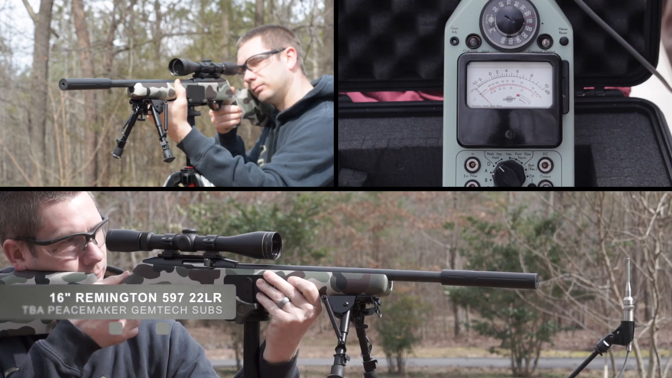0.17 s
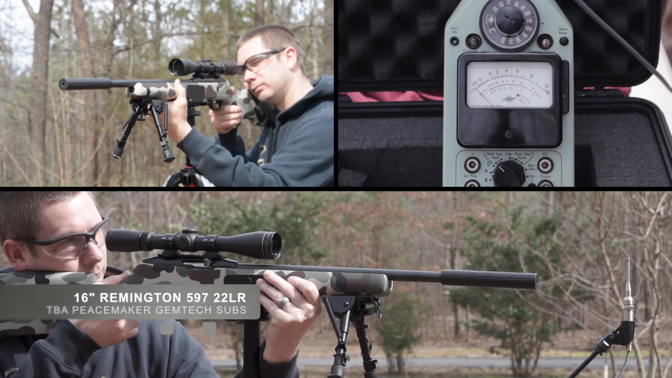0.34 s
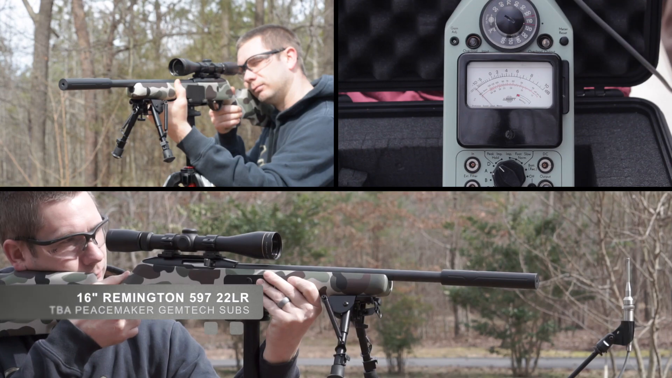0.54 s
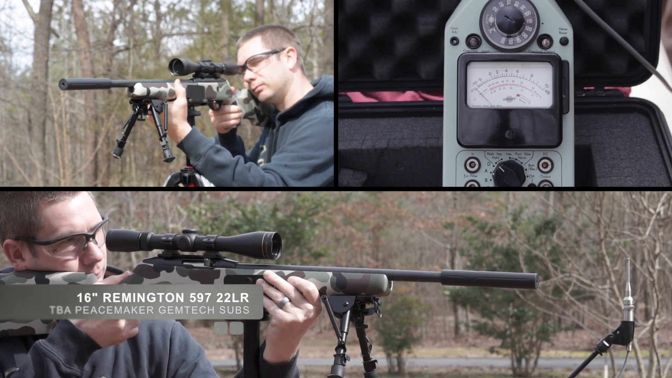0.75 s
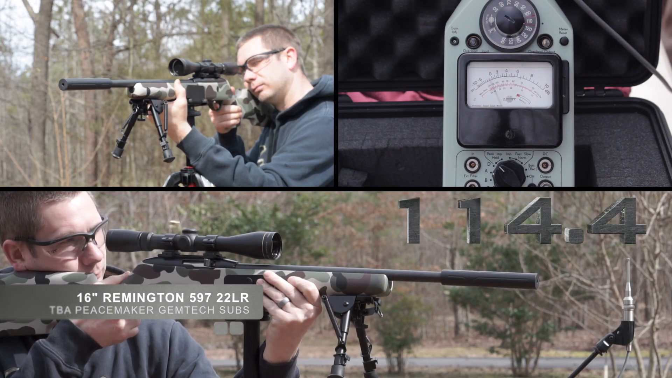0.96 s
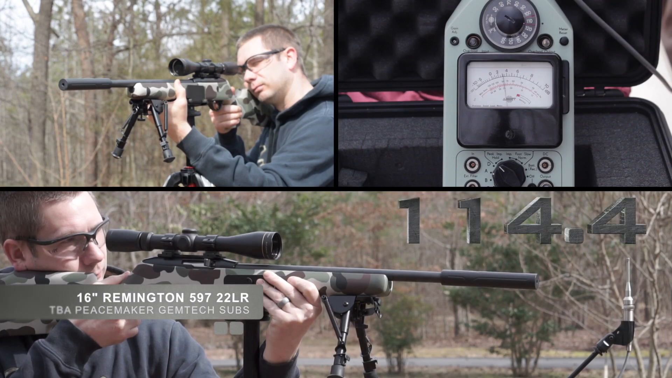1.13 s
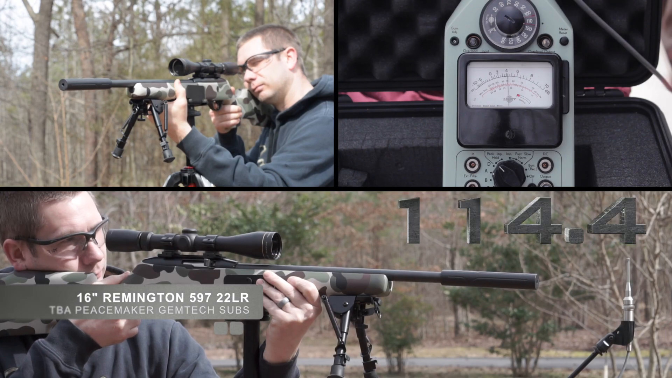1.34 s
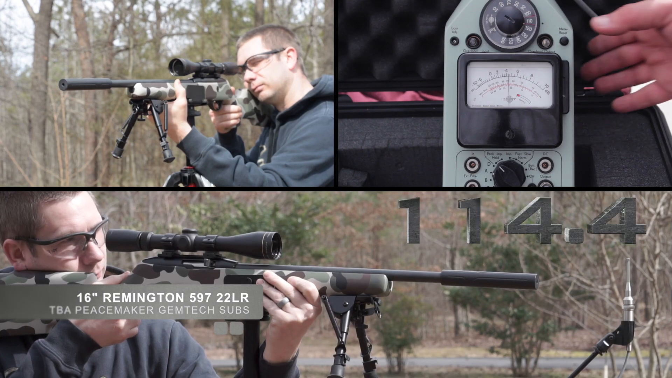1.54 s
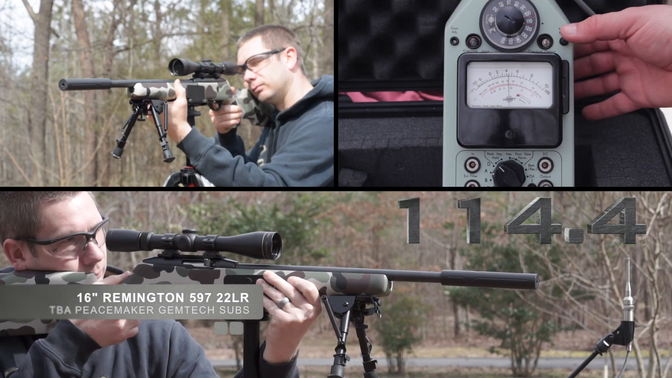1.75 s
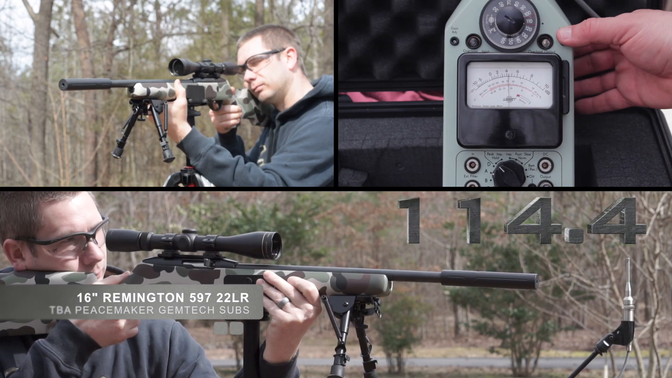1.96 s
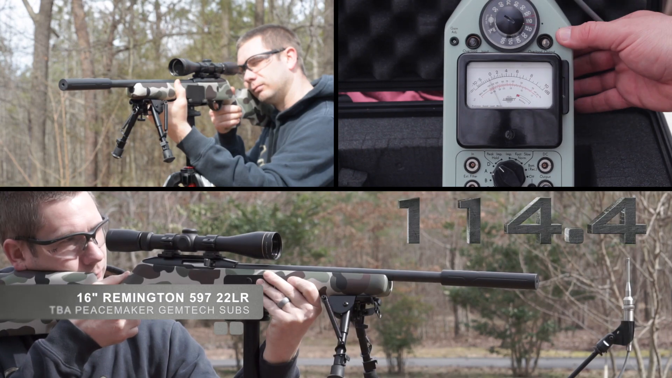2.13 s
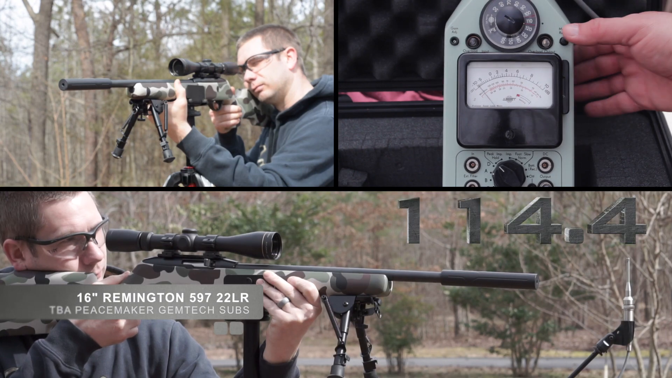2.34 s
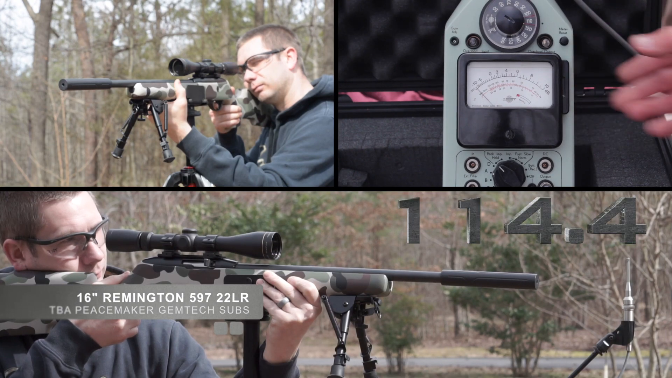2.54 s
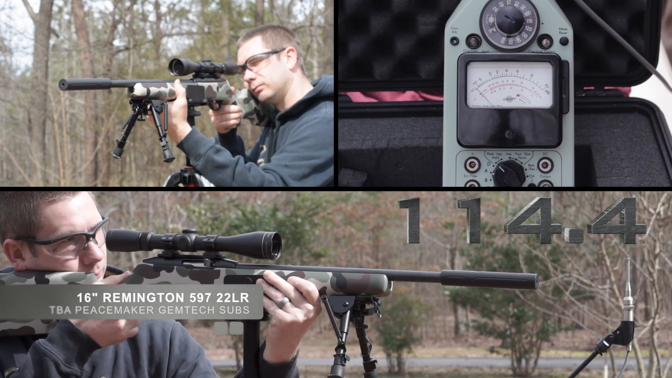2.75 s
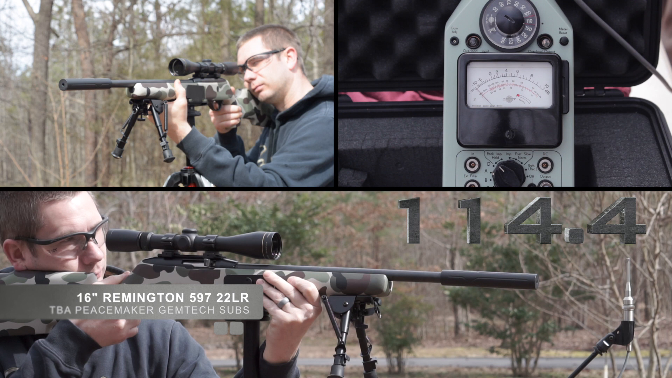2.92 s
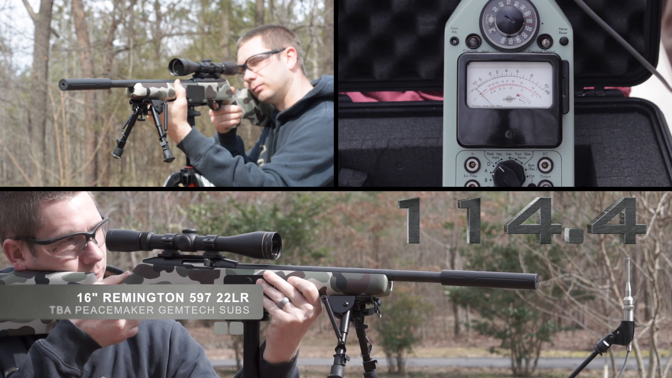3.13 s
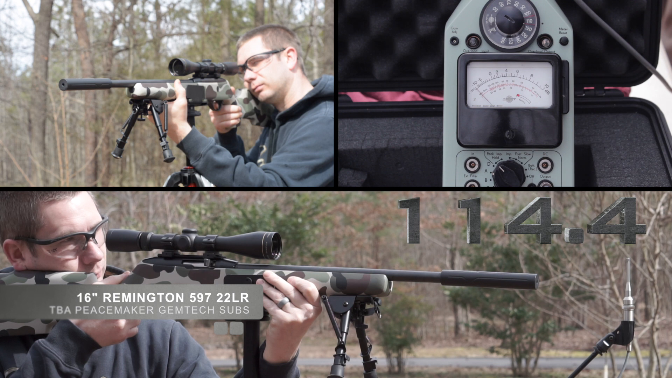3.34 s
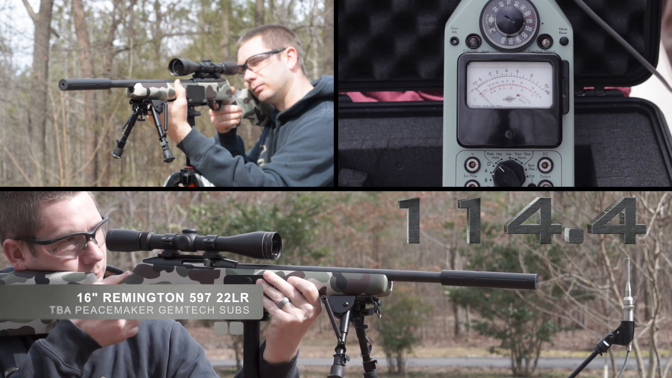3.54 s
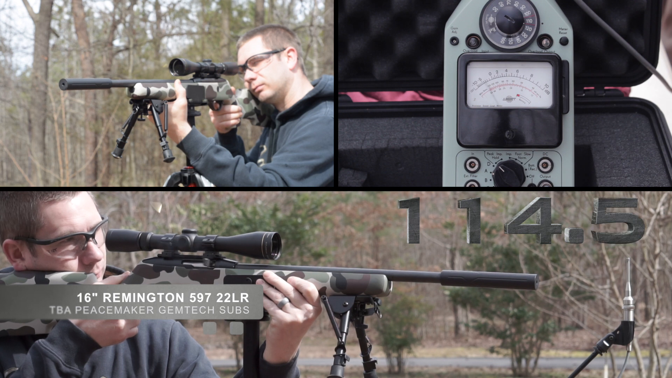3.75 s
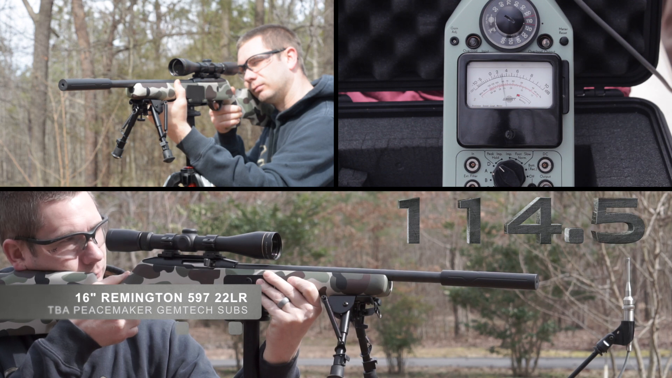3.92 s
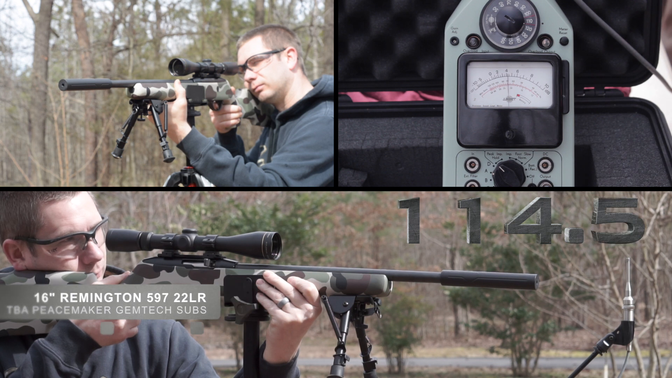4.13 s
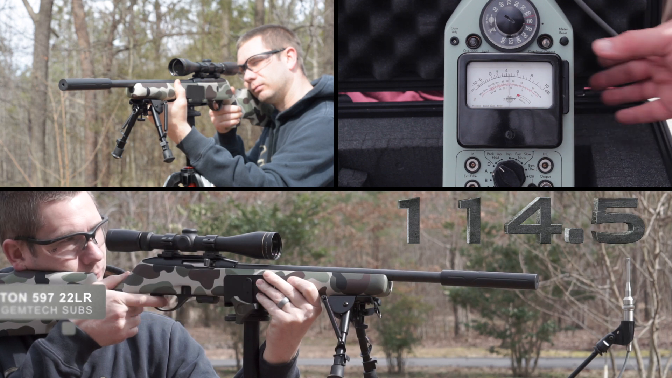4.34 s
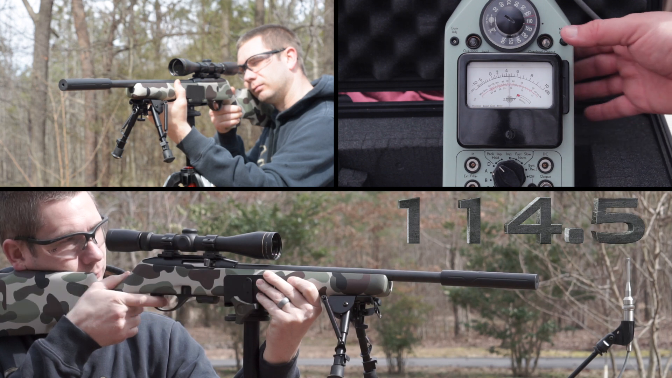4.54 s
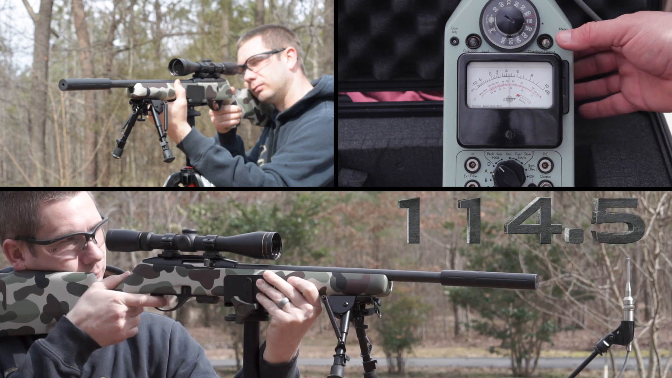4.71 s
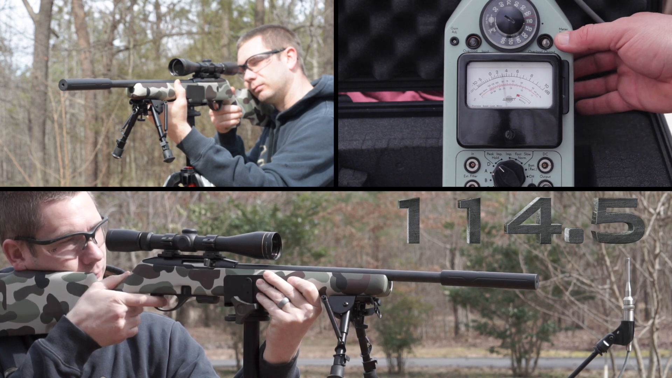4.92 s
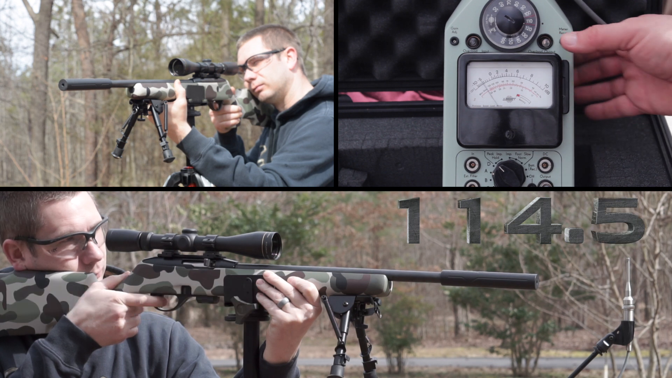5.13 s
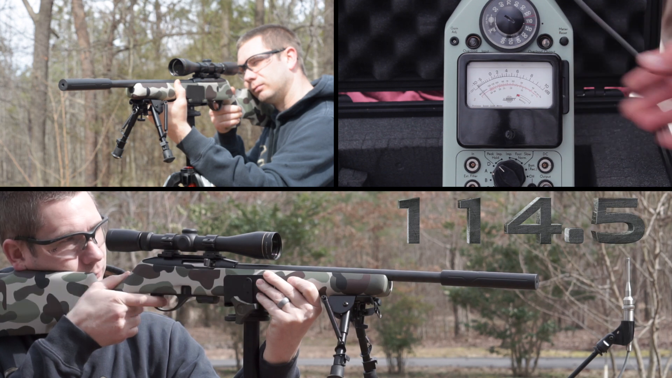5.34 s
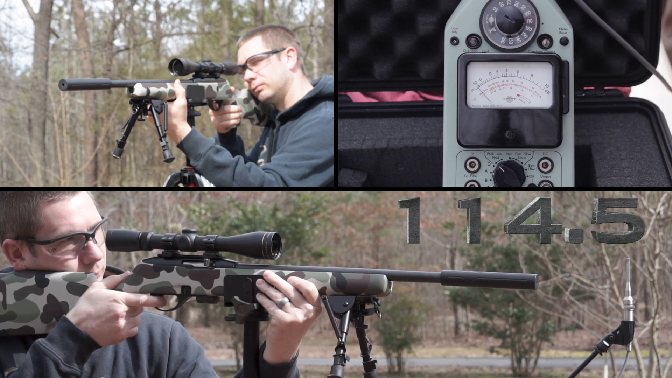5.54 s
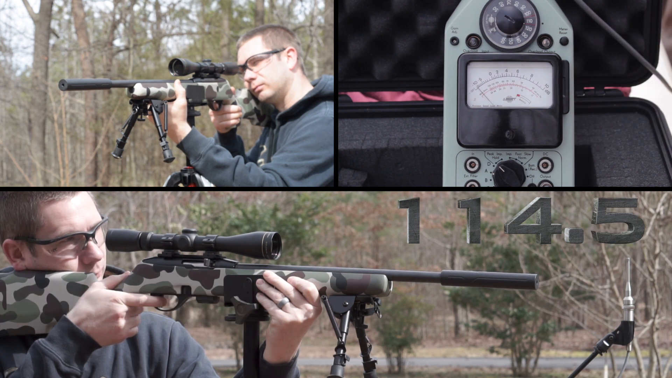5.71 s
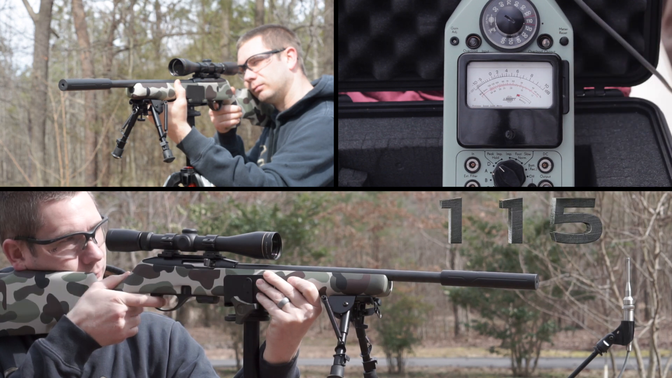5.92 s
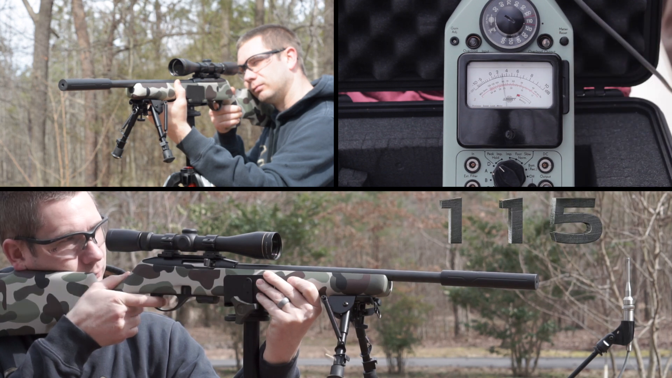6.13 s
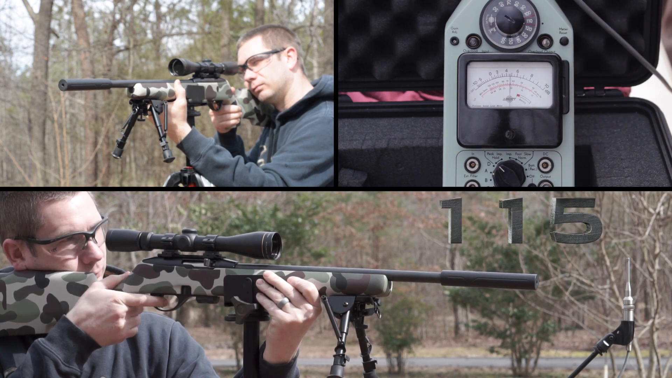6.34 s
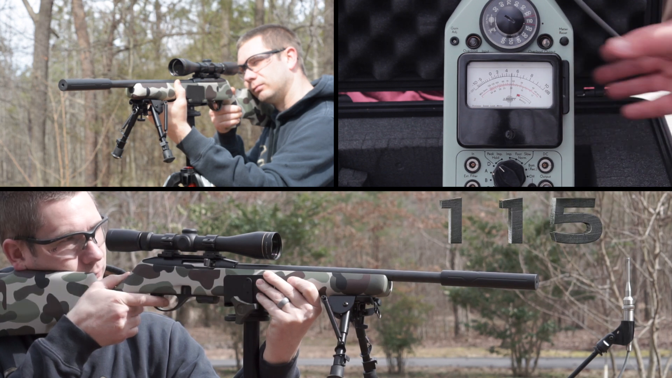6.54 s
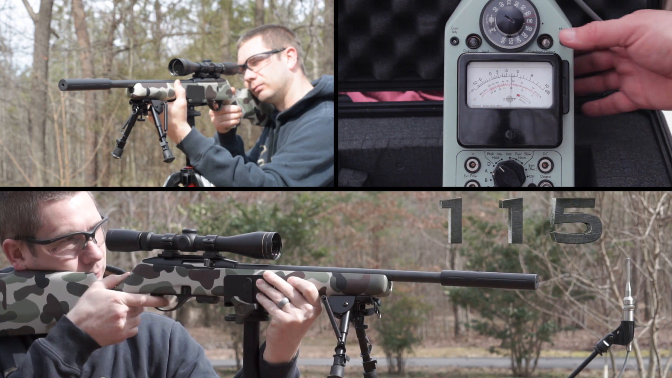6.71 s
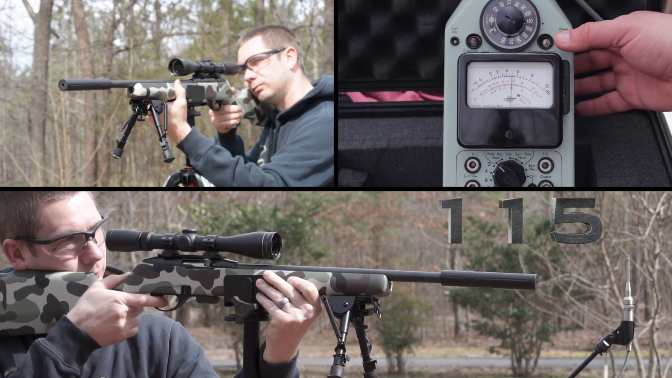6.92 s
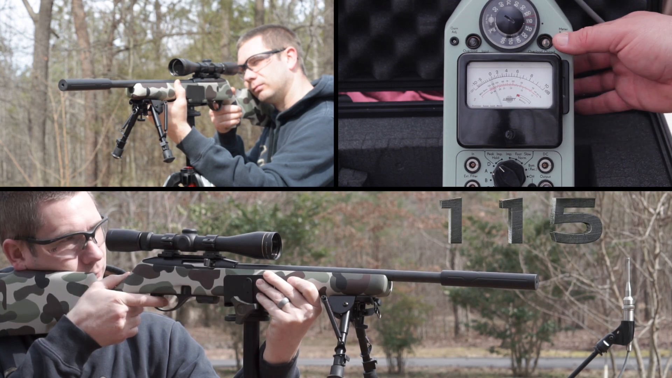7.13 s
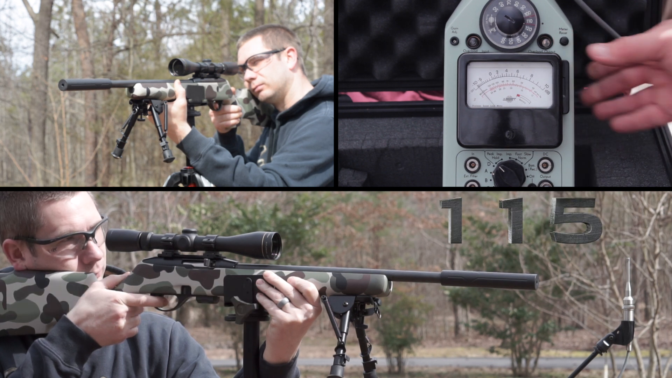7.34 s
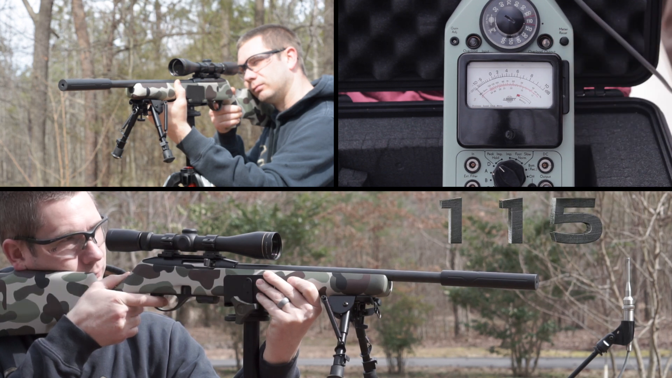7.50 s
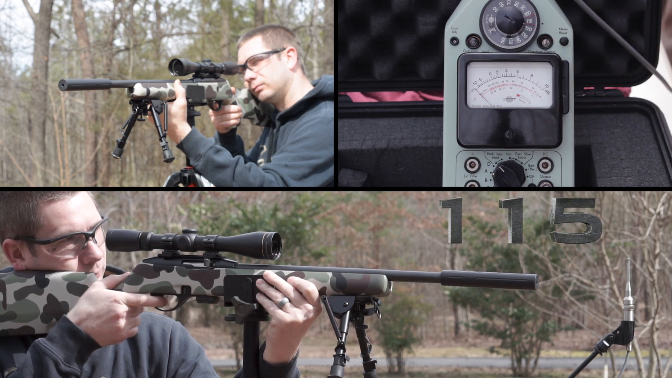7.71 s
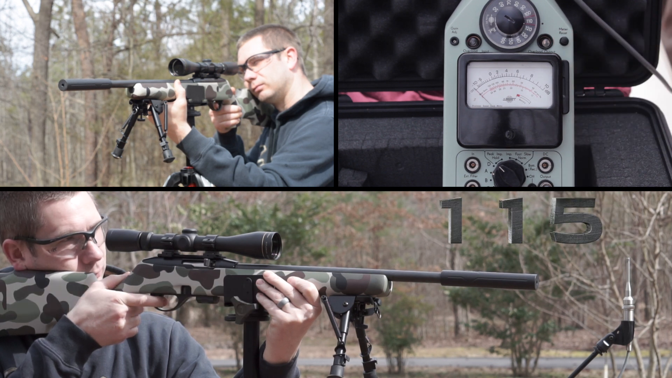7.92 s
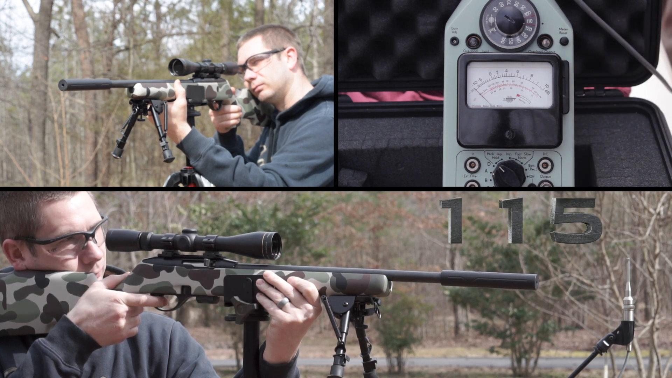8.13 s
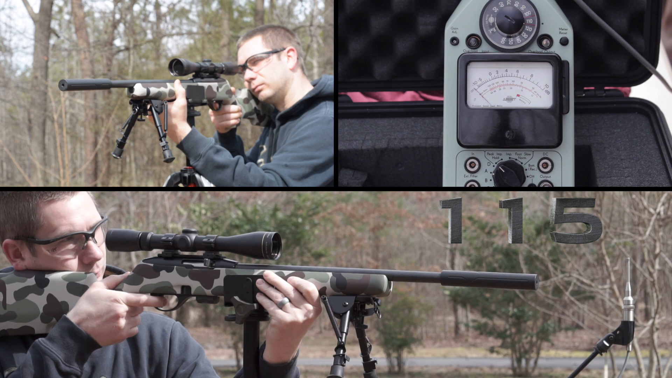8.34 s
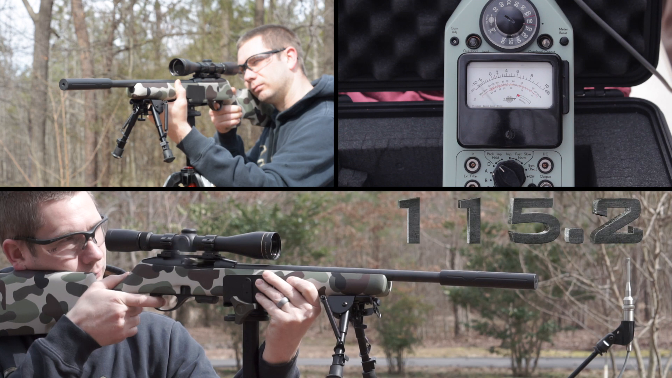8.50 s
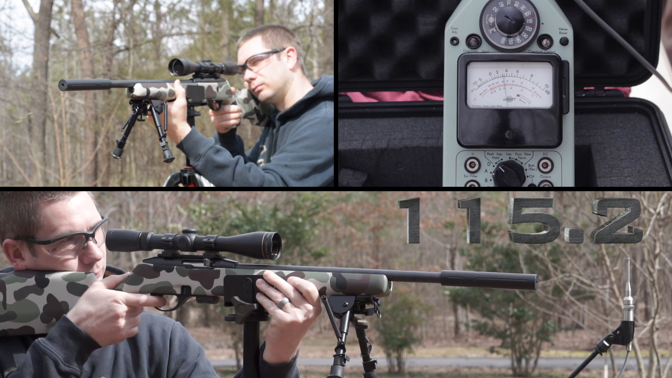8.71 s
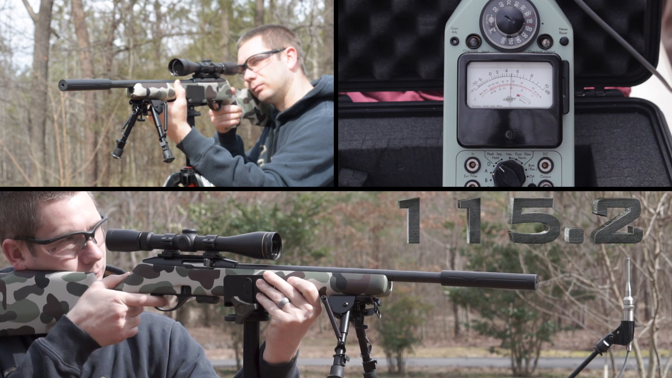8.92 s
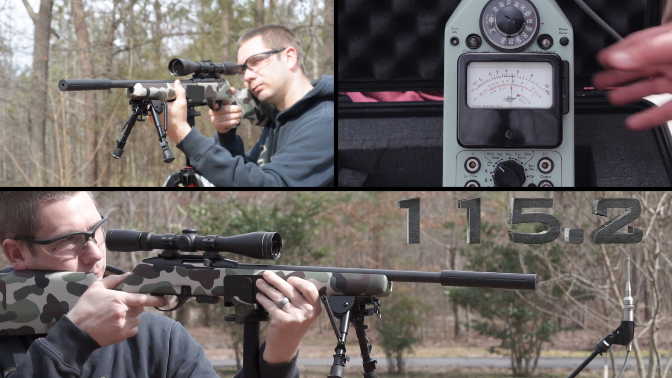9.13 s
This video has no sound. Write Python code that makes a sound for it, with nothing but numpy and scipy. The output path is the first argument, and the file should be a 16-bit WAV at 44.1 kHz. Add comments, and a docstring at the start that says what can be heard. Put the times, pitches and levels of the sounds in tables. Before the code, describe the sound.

Close microphone outdoors at a tree line, over soft low traffic rumble and a fading distant car. A quiet semi-automatic rifle fires four times, spaced two to three seconds apart: snappy puff, steel clatter, small case tap, faint far thud. After the third, the case bounces with a tiny ping and one low hollow boom sounds. Wind gusts gently before the last shot.

```python
"""Far traffic, a car drawing away and a little wind lie under the whole scene: the edge of a wood.
Four times a quiet small-bore rifle fires: a hammer tick, then a puff of gas through its suppressor,
which rings the tube; the bolt slides, slams shut and strikes again, and the trees add a faint tail.
Then the spent case knocks on something hard and the bullet's thud returns from a far earth bank.
After the third shot one case bounces and pings, and a single low, hollow boom is heard."""
import sys
import numpy as np
from scipy import signal
from scipy.fft import rfft, irfft
from scipy.io import wavfile
from scipy.ndimage import uniform_filter1d

SR = 44100
rng = np.random.default_rng(int(sys.argv[2]) if len(sys.argv) > 2 else 0)


def output_pcm(signal):
    """Save a mono or channel-first signal as 16-bit PCM at the path in sys.argv[1].

    Samples are clipped to [-1, 1] before scaling.
    """
    pcm = np.clip(np.atleast_2d(signal).T, -1, 1) * 32767
    wavfile.write(sys.argv[1], SR, np.round(pcm).astype(np.int16))


N = 408581
TIME = np.arange(N) / SR  # seconds

# All levels are relative: most layers get a further trim where they are mixed.
# Colour of the open air: pitch_hz, level_db (per Hz)
AIR_COLOUR = [(15, -37), (25, -11), (64, 0), (80, 0.5), (212, -16.5), (285, -17.5), (317, -19), (405, -20),
              (695, -21), (962, -19.5), (1520, -24.5), (2760, -35.5), (4740, -37.5), (14800, -41),
              (16000, -41)]
# Colour of the wind: pitch_hz, level_db (per Hz)
WIND_COLOUR = [(20, -2.5), (35, 0.5), (70, 2), (115, 3), (170, -9.5), (280, -24.5), (600, -50.5)]
# Gusts of wind: peak_s, level_db
WIND_GUSTS = [(4.65, -64.5), (7.6, -59), (8.07, -58.5), (8.31, -55), (9.25, -65.5)]
# The rounds fired: start_s, gas_level_db, crack_level_db, bolt_cycle_s, case_flight_s, bank_thud_level_db
ROUNDS = [(0.9205, -16.5, -6, 0.041, 0.29, -73), (3.7640, -15.5, -6.5, 0.043, .2663, -64),
          (5.9973, -15, -8.5, .0418, .2803, -64), (8.5462, -15, -13, .0442, .2878, -66.5)]
# Colour of the gas, also used for the hammer and ejection: pitch_hz, level_db (per Hz)
GAS_COLOUR = [(100, -20), (300, -16), (550, -11), (750, -10), (1400, 0), (2400, 1), (3200, -3.5),
              (4400, -2), (6500, -8), (10000, -10.5), (13000, -14), (16000, -13.5)]
# Ringing of suppressor and barrel: pitch_hz, level_db, time_to_fall_60_db_s
TUBE_MODES = [(427, -16, .03), (560, -4.5, .028), (940, -14.5, 0.052), (1067, -10.5, 0.063),
              (1386, -3, 0.052), (1407, -3, .035), (1850, -9, 0.021), (2020, -8.5, .035), (2410, 4, .038),
              (2633, -1.5, 0.053), (3300, -8, 0.039), (3360, -9, .03), (3590, -6.5, .035),
              (3920, -9.5, 0.041), (4380, -6, .03), (5430, -11, .03), (6610, -11.5, .02),
              (9000, -11.5, .02)]
# Colour of the sliding bolt: pitch_hz, level_db (per Hz)
SLIDE_COLOUR = [(200, -11.5), (500, -9.5), (1400, 2.5), (2000, -4.5), (3000, -5), (5000, -10.5),
                (8000, -13), (16000, -18)]
# Colour of the bolt's slam and the rattle: pitch_hz, level_db (per Hz)
SLAM_COLOUR = [(150, -31.5), (380, -15), (560, -4.5), (900, -6.5), (1400, 3), (2800, -8.5), (4600, 6),
               (6500, -6.5), (9000, -4.5), (11000, -11.5), (13000, -1.5), (16000, -13.5)]
# Colour of the bolt's second strike: pitch_hz, level_db (per Hz)
REBOUND_COLOUR = [(200, -20), (450, -14.5), (750, -0.5), (1050, -7), (1500, 4), (2400, -7), (4800, -0.5),
                  (7000, -9.5), (10000, -17), (16000, -19)]
# Ringing of receiver and bolt: pitch_hz, level_db, time_to_fall_60_db_s
BOLT_MODES = [(590, -5.5, 0.037), (635, -9, 0.042), (780, -7.5, .04), (1290, -3, .05), (1510, -1, .045),
              (1600, -8, .04), (1920, -8, .05), (6830, -9, .05), (2600, -9, .04), (3730, -7, 0.041),
              (4380, -3.5, .04), (4506, -6, .035), (5130, -2.5, .045), (5610, -5.5, .04),
              (8740, -11.5, 0.031), (12900, -8.5, 0.026)]
# Colour of the trees' scatter: pitch_hz, level_db
TREE_COLOUR = [(100, -13.5), (300, -21.5), (700, -19), (1500, -11.5), (2500, -9), (5000, -11), (7000, -16),
               (10000, -16.5), (15000, -20)]
# How long the trees' scatter lasts: pitch_hz, time_to_fall_60_db_s
TREE_DECAY = [(100, 1.2), (1000, 2.4), (2500, 1.5), (5000, 1.1), (8000, .85), (15000, 0.41)]
# Colour of the landing case: pitch_hz, level_db (per Hz)
CASE_COLOUR = [(300, -13), (520, -5), (680, 7), (900, -11), (1450, 11), (2200, -1), (3400, 8), (6000, -2),
               (8000, -3.5), (11000, -10.5), (16000, -23)]
# Ringing of the case and what it lands on: pitch_hz, level_db, time_to_fall_60_db_s
LANDING_MODES = [(690, -13, .04), (1430, -17, .025), (3150, -14, .025), (3800, -16, .025),
                 (5000, -18, .025), (6900, -20, .025)]
# Colour of the thud at the earth bank: pitch_hz, level_db (per Hz)
BANK_COLOUR = [(50, -9), (100, 6), (200, -3), (350, -6), (700, -11), (1500, -47), (5000, -37.5)]
# One case bounces a second time: start_s, level_db
SECOND_BOUNCE = (6.3932, -59.5)
# The bouncing case ringing by itself: pitch_hz, level_db, time_to_fall_60_db_s
BOUNCE_MODES = [(5200, -7, .035), (5450, -4, .04), (5750, -4, .04)]
# A single low boom: start_s, level_db
BOOM_START = (6.443, -48.5)
# Ringing of that hollow boom: pitch_hz, level_db, time_to_fall_60_db_s
BOOM_MODES = [(78.9, 1.5, 0.54), (96, -1, 0.37), (121, -14, 0.14)]

AIR_DB = -67
# Time constants of a gust, and the light air between gusts
GUST_RISE_S, GUST_FALL_S, BREEZE_DB = .14, .18, -84
# The far car: level at the start, fading, and the band of its tyre noise
CAR_DB, CAR_FADE_DB_PER_S, TYRE_BAND_HZ = -76.5, 3, (650, 1550)
HAMMER_LEAD_S, HAMMER_DB = .0043, -32  # the hammer falls just before the report
THUMP_DB = -25.5  # the slug of gas at the muzzle
# Part of its cycle after which the bolt reaches the back and throws the case out
EJECT_SHARE, EJECT_DB = .435, -36
SLAM_DB = -18.5  # the bolt shuts at the end of its cycle
REBOUND_S, REBOUND_DB = .021, -30  # it strikes again this long after the slam
CASE_DB = -45  # the spent case lands at the end of its flight
BANK_RETURN_S = .441  # the bullet flies to the bank and its thud travels back


def from_db(db):
    """Turn decibels into a plain multiplier."""
    return 10 ** (np.asarray(db) / 20)


def rms_one(x):
    """Scale to an average power of one."""
    return x / np.sqrt(np.mean(x ** 2) + 1e-20)


def at_hz(points, hz):
    """Read a table between its points, with pitch on a log scale."""
    pitch_hz, value = np.transpose(points)
    return np.interp(np.log(hz + 1), np.log(pitch_hz), value)


def delayed(x, seconds):
    """Start the sound later, by a whole number of samples."""
    return np.interp(TIME - round(seconds * SR) / SR, TIME, x, left=0)


def coloured(x, spectrum, size=8192):
    """Filter to the given colour without sounding early (minimum phase); white noise keeps its power."""
    gain = rms_one(from_db(at_hz(spectrum, np.fft.rfftfreq(size, 1 / SR))))
    # folding the log spectrum forward in time gives the minimum-phase filter
    cepstrum = irfft(np.log(gain))[:size // 2]
    cepstrum[1:] *= 2
    response = irfft(np.exp(rfft(cepstrum, size)))
    return signal.oaconvolve(x, response)[:N]


def clicks(events):
    """One single-sample pulse for each (start_s, level_db)."""
    out = np.zeros(N)
    for start_s, level_db in events:
        out[round(start_s * SR)] += from_db(level_db)
    return out


def bursts(events, rise, hold, t60):
    """Noise of even colour that swells, holds and dies away; events in one call are much alike."""
    t, out = TIME[:SR // 5], np.zeros(N)
    shape = (1 - np.exp(-t / rise)) * from_db(-60 * np.maximum(t - hold, 0) / t60)
    common = rng.standard_normal(len(t))
    for start_s, level_db in events:
        puff = shape * (common + .5 * rng.standard_normal(len(t)))
        for _ in range(3):
            # make every pitch equally strong, then restore the rise and fall
            even = irfft(np.exp(1j * np.angle(rfft(puff))), len(t))
            loudness = np.sqrt(np.abs(uniform_filter1d(even ** 2, size=64)) + 1e-18)
            puff = shape * even / loudness
        at = round(start_s * SR)
        out[at:at + len(t)] += from_db(level_db) * puff[:N - at]
    return out


def struck(events, modes):
    """Each blow rings every mode with a slightly different strength and pitch."""
    t, out = TIME[:SR // 3], np.zeros(N)
    hz, db, t60 = np.transpose(modes)[:, :, None]
    signs = (-1) ** np.arange(len(modes))[:, None]
    for start_s, level_db in events:
        strength_db, detune = rng.standard_normal((2, len(modes), 1))
        pitch = hz * (1 + .003 * detune)
        fading = from_db(level_db + db + strength_db - 60 * t / t60)
        rings = fading * np.sin(2 * np.pi * pitch * t)
        at = round(start_s * SR)
        out[at:at + len(t)] += (signs * rings).sum(0)[:N - at]
    return out


def grainy(x, spread_db):
    """Some instants stand out: the sound breaks into tiny impacts, with random level steps of 16 samples."""
    steps = rng.standard_normal(len(x) // 16 + 1).clip(-2, 2)
    grain_db = spread_db * np.repeat(steps, 16)[:len(x)]
    return x * rms_one(from_db(grain_db))


def over_ground(x, lag, echo_db, cut_hz):
    """The direct sound and its later, duller bounce off the ground."""
    dull = signal.sosfilt(signal.butter(1, cut_hz, fs=SR, output="sos"), x + 1e-18)
    return x + from_db(echo_db) * delayed(dull, lag)


def wind_strength():
    """Each gust swells and drops in the same way above a light breeze; their powers add."""
    power = from_db(BREEZE_DB) ** 2
    for peak_s, level_db in WIND_GUSTS:
        before, after = (peak_s - TIME) / GUST_RISE_S, (TIME - peak_s) / GUST_FALL_S
        gust = from_db(level_db) * np.exp(-np.maximum(before, after))
        power = power + gust ** 2
    return np.sqrt(power)


def far_car():
    """Tyre noise is a band of hiss that fades steadily as the car draws away."""
    noise = rng.standard_normal(N)
    tyres = signal.sosfilt(signal.butter(4, TYRE_BAND_HZ, "band", fs=SR, output="sos"), noise)
    return from_db(CAR_DB - CAR_FADE_DB_PER_S * TIME) * rms_one(tyres)


def outdoors():
    """Coloured noise makes far traffic, hiss and wind; the car and a ringing low boom join in."""
    air = from_db(AIR_DB) * coloured(rng.standard_normal(N), AIR_COLOUR)
    wind = wind_strength() * coloured(rng.standard_normal(N), WIND_COLOUR)
    return air + wind + far_car() + struck([BOOM_START], BOOM_MODES)


def cycle():
    """When and how hard each part strikes, as rows of (start_s, level_db), one row per round."""
    fired, gas_db, crack_db, bolt_s, flight_s, thud_db = np.transpose(ROUNDS)
    parts = {"hammer": (fired - HAMMER_LEAD_S, HAMMER_DB),
             "gas": (fired, gas_db),
             "crack": (fired, crack_db),
             "thump": (fired, THUMP_DB),
             "eject": (fired + EJECT_SHARE * bolt_s, EJECT_DB),
             "slam": (fired + bolt_s, SLAM_DB),
             "rebound": (fired + bolt_s + REBOUND_S, REBOUND_DB),
             "case": (fired + flight_s, CASE_DB),
             "thud": (fired + BANK_RETURN_S, thud_db)}
    return {name: list(np.broadcast(s, db)) for name, (s, db) in parts.items()}


def sliding_bolt(ejections):
    """Metal scraping on metal is a grainy hiss made of many tiny impacts."""
    slide = grainy(bursts(ejections, rise=.004, hold=.014, t60=.06), spread_db=4)
    return coloured(delayed(slide, .003), SLIDE_COLOUR) * from_db(-8)


def rattle(slams, rebounds):
    """The spring and loose parts rattle on after each blow."""
    after_slam = from_db(-21.5) * bursts(slams, rise=.001, hold=.0028, t60=.05)
    after_rebound = from_db(-16) * bursts(rebounds, rise=.00081, hold=.003, t60=.07)
    return coloured(grainy(after_slam + after_rebound, spread_db=4), SLAM_COLOUR)


def action(when):
    """Hammer, ejection, slam and rebound are short noises; the last two also ring the steel."""
    slams, rebounds = when["slam"], when["rebound"]
    hammer = coloured(bursts(when["hammer"], rise=.0002, hold=.00093, t60=.03), GAS_COLOUR) * from_db(-5.5)
    eject = coloured(bursts(when["eject"], rise=.00027, hold=.001, t60=.01), GAS_COLOUR) * from_db(1)
    slam = coloured(bursts(slams, rise=.0001, hold=.0006, t60=.012), SLAM_COLOUR) * from_db(1)
    rebound = bursts(rebounds, rise=.0003, hold=.001, t60=.013)
    rebound = coloured(rebound, REBOUND_COLOUR) * from_db(-4.5)
    ringing = from_db(-11.5) * struck(slams, BOLT_MODES) + from_db(-7.5) * struck(rebounds, BOLT_MODES)
    blows = hammer + eject + sliding_bolt(when["eject"]) + slam + rebound
    blows = over_ground(blows, lag=.0055, echo_db=-4, cut_hz=9000)
    return ringing + rattle(slams, rebounds) + blows


def thump(events, lag, hz, width):
    """The slug of gas leaving the suppressor pushes the air through about one slow cycle."""
    t = TIME[:SR // 20] - lag
    push = np.exp(-(t / width) ** 2) * np.sin(2 * np.pi * hz * t)
    return signal.oaconvolve(clicks(events), push)[:N]


def reports(when):
    """A crack, gas rushing through the baffles and ringing the tube, then a soft pop and thump."""
    rush = bursts(when["gas"], rise=.00074, hold=.0067, t60=.039) * from_db(-5)
    crack = delayed(clicks(when["crack"]), .0006) * from_db(7)
    crack = over_ground(crack, lag=.0071, echo_db=-3, cut_hz=10000)
    tube = delayed(struck(when["gas"], TUBE_MODES), .0003) * from_db(-6.5)
    pop = thump(when["thump"], lag=.0051, hz=556, width=.00083) * from_db(5)
    low_thump = thump(when["thump"], lag=.0064, hz=171, width=.0036)
    return coloured(rush + crack, GAS_COLOUR) + tube + pop + low_thump


def trees(x, onset, edge_s, edge_width, edge_db):
    """Countless trunks scatter the sound, highs dying first; the tree line returns a stronger cluster."""
    t = TIME[:SR * 3 // 2]
    edges = np.geomspace(60, 18000, 19)
    trunks = grainy(np.ones(len(t)), spread_db=6)  # a few trunks reflect far more than the rest
    white, response = trunks * rng.standard_normal((2, len(t))), 0
    for k, (low, high) in enumerate(zip(edges, edges[1:])):
        # neighbouring bands use different noise
        band = signal.sosfilt(signal.butter(3, [low, high], "band", fs=SR, output="sos"), white[k % 2])
        hz = np.sqrt(low * high)
        fading = from_db(at_hz(TREE_COLOUR, hz) - 60 * t / at_hz(TREE_DECAY, hz))
        response = response + band * fading
    cluster = 1 + from_db(edge_db) * np.exp(-((t - edge_s) / edge_width) ** 2)
    swell = 1 - np.exp(-t / onset)
    return signal.oaconvolve(x, response * cluster * swell * np.sqrt(10 / SR))[:N]


def spent_cases(landings):
    """The ejected brass knocks and rings on something hard; one case bounces again and pings."""
    knock = coloured(bursts(landings, rise=.000076, hold=.0011, t60=.016), CASE_COLOUR) * from_db(-6)
    knock = over_ground(knock, lag=.0056, echo_db=-8, cut_hz=10000)
    ringing = from_db(1.5) * struck(landings, LANDING_MODES)
    tick = coloured(bursts([SECOND_BOUNCE], rise=.0002, hold=.0006, t60=.012), CASE_COLOUR) * from_db(-2)
    return knock + ringing + tick + struck([SECOND_BOUNCE], BOUNCE_MODES)


def backstop(thuds):
    """The bullet's thud comes back dull and smeared from the far bank."""
    return coloured(bursts(thuds, rise=.0027, hold=.016, t60=.16), BANK_COLOUR)


def scene():
    """The open air, the rifle close by, its scatter from the wood and the far bank."""
    when = cycle()
    rifle = action(when) + reports(when) + spent_cases(when["case"])
    # summed over all directions, the report and the slam leave the rifle as plain sharp pulses
    pulses = from_db(9.5) * clicks(when["gas"]) + from_db(5) * clicks(when["slam"])
    radiated = pulses + from_db(-29.5) * rifle
    tail = trees(radiated, onset=.016, edge_s=.142, edge_width=.015, edge_db=1)
    return (outdoors() + rifle + tail + backstop(when["thud"]))[None]


def record(dry):
    """The highest peaks are rounded and everything above 16 kHz is cut."""
    top = .7
    rounded = top * np.tanh(dry / top)
    return signal.sosfilt(signal.ellip(10, .1, 80, 16000, fs=SR, output="sos"), rounded)


dry = scene()
out = record(dry)
output_pcm(out)
```